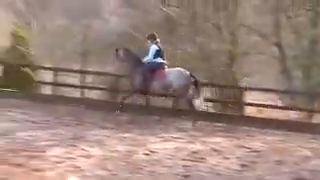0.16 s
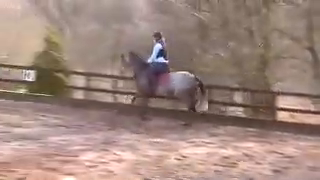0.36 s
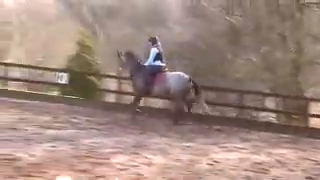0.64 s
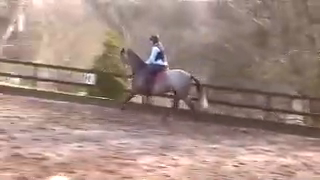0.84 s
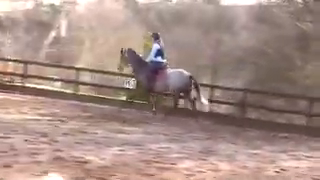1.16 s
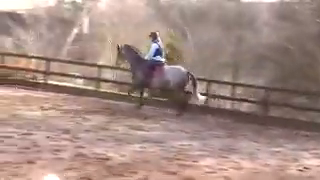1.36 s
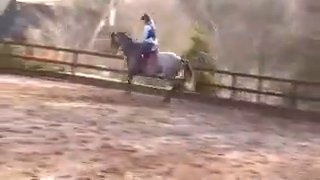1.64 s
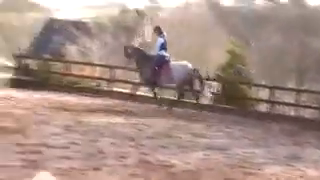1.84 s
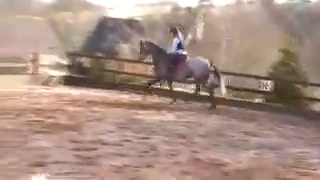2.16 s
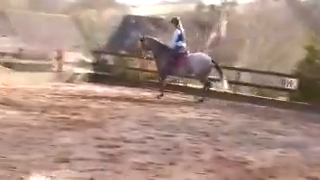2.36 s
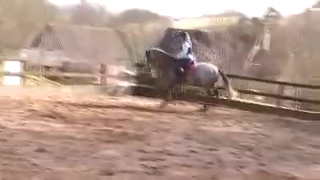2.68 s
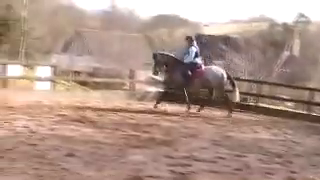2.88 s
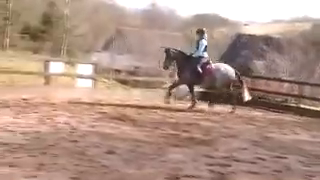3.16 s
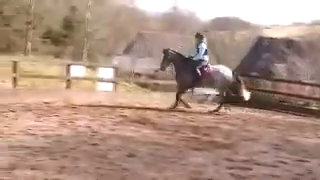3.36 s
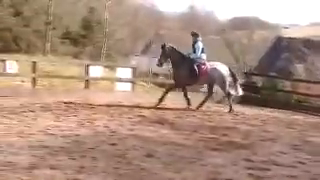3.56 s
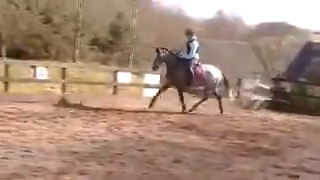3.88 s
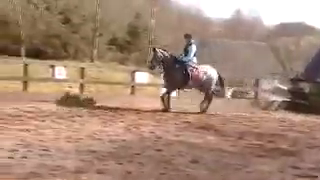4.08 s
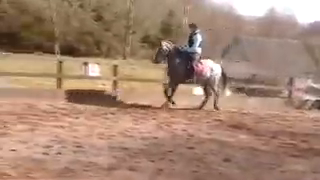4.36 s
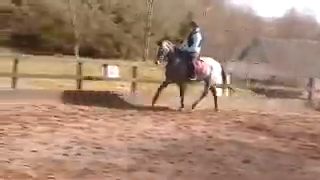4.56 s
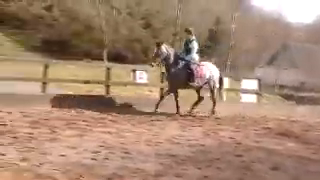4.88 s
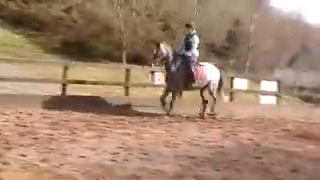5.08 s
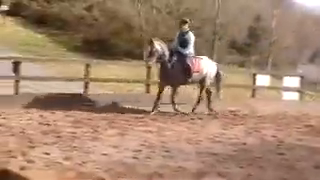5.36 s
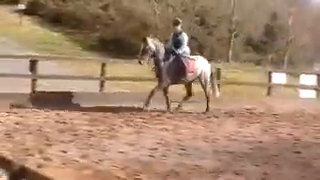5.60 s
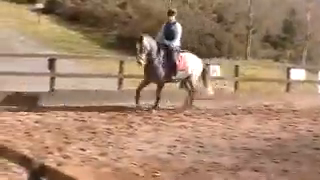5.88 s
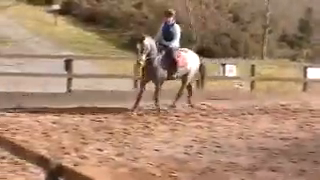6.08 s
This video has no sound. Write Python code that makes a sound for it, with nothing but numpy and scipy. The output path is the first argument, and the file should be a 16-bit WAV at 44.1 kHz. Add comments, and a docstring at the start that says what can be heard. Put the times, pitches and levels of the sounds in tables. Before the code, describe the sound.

A low, soft wash of open air and a fluttering fine hiss run throughout, in mono with faint diffuse reflections. In the first 0.3 s come a bright sand flick, a barely audible high tone, a scuff, a soft saddle bump and a dull low hoof thud. Light scuffs and sand patters follow, with a hard click at 0.5 s and a thin ringing one near 1.3 s. A thud at 1.6 s and a sharp click at 1.8 s precede a heavy, hollow blow at 1.9 s, then falling sand and a lower thump. Small clicks and scuffs scatter around 2.1-2.7 s; it grows sparser, with faint bumps, until a loud hard clack at 3.8 s. A gritty scrape comes at 4.1 s, low thuds at 4.6 s and faint, very high tones around 5 s. The heaviest knocking thump lands at 5.4 s, followed by softer thuds at 5.6, 5.8 and 6.1 s.

```python
"""A horse trots round an outdoor sand arena, under a low wash of air and a restless noise-band hiss.
Bright flicks of sand, a faint high tone, a scuff and a soft saddle bump come first, each with a diffuse answer.
Then weighted hooves fall among the scuffs: noise grains make thud, crack and spray, a sine makes the push.
Hard clicks of tack and stones join after half a second, as grains over decaying tones.
Heavy blows near two seconds and, heaviest, late on bring out a short, hollow-coloured cluster of tones."""
import sys
import numpy as np
from scipy import signal
from scipy.fft import rfft, irfft, next_fast_len
from scipy.io import wavfile
from scipy.ndimage import map_coordinates

SR = 44100
rng = np.random.default_rng(int(sys.argv[2]) if len(sys.argv) > 2 else 0)


def file_out(sig):
    """Save sig as 16-bit WAV at sys.argv[1]."""
    # one column per channel
    cols = np.atleast_2d(sig).T
    # limit, then scale
    lim = np.clip(cols, -1, 1)
    pcm = np.round(lim * 32767).astype(np.int16)
    wavfile.write(sys.argv[1], SR, pcm)


N = 275007
TOP_HZ = 14000  # upper band limit
BLOW = np.arange(int(SR * .7)) / SR  # time axis of one event in seconds

# All event levels are relative: each part of a sound adds its own offset in dB.
# Spectrum of the open air. Each row: frequency in Hz, density in dB per Hz.
AIR_SPECTRUM = [(15, -61), (25, -19), (113, -3), (164, -1.5), (403, -5), (525, -6), (824, -5.5), (1190, -8),
                (1680, -9.5), (2570, -11.5), (4370, -15.5), (10700, -15.5), (12600, -18), (14000, -26)]
# Hiss of leaves and settling sand. Each row: time in seconds, relative level in dB.
HISS_LEVELS = [(0.0, -56.5), (1.02, -61), (1.44, -54), (1.63, -55.5), (1.98, -57), (2.19, -58), (3.56, -61),
               (3.89, -58.5), (4.79, -60), (5.4, -57.5), (5.51, -57), (6.24, -57.5)]

# Flicks of loose sand. Each row: start in seconds, rise in seconds, relative level in dB.
SAND_FLICKS = [(0.029, 0.0016, -48), (0.16, 0.0044, -48), (0.448, 0.0014, -46.5), (0.52, .016, -51.5),
               (0.69, 0.032, -53.5), (0.802, .002, -50), (0.91, 0.013, -46.5), (1.016, 0.0065, -51),
               (1.155, 0.0076, -44.5), (1.191, .002, -50), (1.685, 0.0033, -45.5), (1.862, .003, -51),
               (2.538, 0.0033, -44), (5.086, 0.027, -43), (5.687, 0.0027, -49)]
FLICK_T60_S, FLICK_T60_PER_RISE = 0.057, 5.4  # a slower throw scatters for longer
# Treble of flicks and clicks. Each row: frequency in Hz, density in dB per Hz.
SNAP_SPECTRUM = [(1500, -36), (2800, -6), (3550, -5.5), (4500, -9.5), (6000, -5.5), (7000, -3), (9300, 0.5),
                 (11500, -1), (14000, -17)]

# Reverberation of fence and trees. Each row: frequency in Hz, time to fall 60 dB in seconds.
ARENA_DECAY = [(100, 0.89), (500, 0.71), (2000, 0.42), (6000, 0.39), (13000, 0.2)]

# Faint thin high tones, perhaps of tack or a distant bird.
# Each row: start in seconds, pitch in Hz, relative level in dB.
FAINT_TONES = [(.08, 3560, -58.5), (1.4, 3940, -58), (3.96, 4120, -58), (4.969, 9300, -47),
               (5.336, 9160, -48.5)]
# Cycles to build up, then cycles to fall 60 dB: higher tones are shorter.
TONE_RISE_CYCLES, TONE_FALL_CYCLES = 200, 2000

# Hooves skimming the surface, and at 1.985 s sand falling back after the heavy blow.
# Each row: start in seconds, rise in seconds, relative level in dB, grit (crunch over knock) in dB.
SCUFFS_AND_FALLING_SAND = [(0.095, 0.0091, -46, -3), (0.356, 0.0066, -44, -4.5), (0.498, 0.028, -39, -13),
                           (0.57, .005, -43.5, -8), (0.69, 0.042, -51, -7), (1.227, 0.0058, -41, -8),
                           (1.351, 0.011, -43.5, -6.5), (1.985, 0.024, -43, 4.5), (2.223, 0.006, -40, -7),
                           (2.381, .011, -43, -4.5), (2.619, 0.021, -47.5, -3), (3.301, .004, -55.5, 2),
                           (4.124, 0.017, -33.5, 2.5), (4.326, .004, -42, -12), (4.388, 0.0034, -40, -8.5),
                           (4.836, 0.021, -47.5, -12), (4.982, 0.016, -38, 0.5), (5.084, .026, -45, -2.5)]
# These hardly sink in, so they have little thud; their pitch varies about the middle value.
SCUFF_T60_S, SCUFF_DEPTH_DB, SCUFF_MIDDLE_HZ = 0.28, -10.5, 334
# Hooves landing under full weight. Each row: start in seconds, rise in seconds,
# base time to fall 60 dB in seconds, relative level in dB, grit (crunch over knock) in dB,
# pitch of the push in Hz.
WEIGHTED_FOOTFALLS = [(0.208, 0.007, 0.35, -30, -12, 171), (0.279, 0.015, 0.23, -41, -2.5, 179),
                      (1.583, .004, 0.22, -36.5, -1, 128), (1.9, 0.0015, 0.28, -18, -6.5, 386),
                      (2.052, 0.0083, .25, -29, -2, 181.4), (3.162, 0.0064, 0.38, -41.5, -4.5, 119),
                      (4.59, .018, 0.44, -34, -15.5, 159.6), (4.668, 0.0096, 0.32, -41.5, -3, 161),
                      (5.419, 0.0089, 0.21, -15.5, -4.5, 251.4), (5.574, 0.026, 0.23, -31, -8.5, 234),
                      (5.61, 0.019, .2, -29.5, -7, 302.6), (5.811, .02, 0.36, -38.5, -3, 394),
                      (6.092, 0.018, 0.29, -31, -11.5, 139), (6.13, 0.006, .36, -37, -5.5, 124)]
# At the firm pitch thud and knock are alike; softer ground is lower and thuds more.
FIRM_HZ, SINK_DB_PER_OCTAVE = 294, 5.5
# Gritty, shallow steps throw the most sand (dB, dB per dB, dB per dB).
SPRAY_DB, SPRAY_PER_GRIT, SPRAY_PER_DEPTH = -8, 0.99, -0.24
# Spectra of the four grain parts of a blow. Each row: frequency in Hz, density in dB per Hz.
THUD_SPECTRUM = [(25, -40), (50, -24), (80, -10.5), (120, -3), (165, -3.5), (270, -5.5), (380, -20),
                 (900, -59)]
KNOCK_SPECTRUM = [(120, -49), (240, -10), (330, 1), (550, 0), (820, -0.5), (1050, -4.5), (1600, -15),
                  (4000, -65)]
CRUNCH_SPECTRUM = [(400, -49), (850, -20), (1100, -3), (1700, 0.5), (2400, -3), (3100, -11.5),
                   (4500, -19.5), (9000, -94)]
SPRAY_SPECTRUM = [(1200, -87), (2500, -2), (3400, 3), (5200, 3), (7500, 1), (9500, 3.5), (12500, 3),
                  (14000, -14)]
# Tones that colour a heavy blow. Each row: frequency in Hz, mean relative level in dB,
# time to fall 60 dB in seconds.
HOLLOW_TONES = [(168, -2, 0.49), (241.8, -5.5, 0.65), (322.8, -1, 0.25), (400, -22, 0.15), (520, -28, 0.25),
                (520, -3, 0.08), (636, 1, 0.31), (751, -4, 0.35), (813, 0, 0.28), (856, -17, 0.14),
                (1050, -26, 0.21), (1220, -11.5, 0.31), (1326, -5.5, 0.23), (1522, 2, 0.1),
                (1564, -6.5, 0.18), (1790, -8, 0.074)]

# Soft bumps of the saddle. Each row: start in seconds, relative level in dB.
SADDLE_BUMPS = [(0.112, -24.5), (.724, -31.5), (0.885, -33.5), (2.511, -34), (3.123, -35), (3.621, -37),
                (3.9, -31), (4.517, -31.5)]
BUMP_HZ = 195

# Sharp clicks of tack and stones. Each row: start in seconds, base time to fall 60 dB in seconds,
# relative level in dB, hardness (crack over body) in dB.
SHARP_CLICKS = [(0.505, 0.04, -44, 13), (1.277, 0.16, -33, 36), (1.685, 0.079, -45, 24),
                (1.798, 0.07, -28, 15), (2.125, 0.016, -44, -12), (2.263, 0.032, -53, 3),
                (2.297, .03, -50, 6), (2.318, 0.031, -53, 7), (2.664, 0.054, -45.5, 8),
                (3.555, 0.12, -41.5, 11.5), (3.727, 0.32, -42, 5.5), (3.775, 0.068, -19.5, 4)]
CONTACT_S = 0.00399  # build-up of a click
SNAP_DB, SNAP_PER_HARDNESS = 1.5, -0.48  # hard contacts ring more than they snap
# Body of a click. Each row: frequency in Hz, density in dB per Hz.
CLACK_SPECTRUM = [(130, -42), (300, -4), (420, -7.5), (620, 1), (920, 2.5), (1150, -13), (2000, -46),
                  (5000, -68)]
# Modes of the hard tack. Each row: frequency in Hz, mean relative level before tilt in dB,
# time to fall 60 dB in seconds.
TACK_RING_MODES = [(855, -8, 0.1), (926, 3, 0.098), (987, 0.5, 0.075), (1502, -21, 0.15), (1745, -5, 0.017),
                   (1810, 4.5, 0.072), (1920, 7.5, 0.03), (2343, -1.5, 0.068), (2540, -2, 0.028),
                   (2743, 5, 0.039), (3432, 0.5, 0.039), (3620, -5, 0.04)]


def amp(db):
    """Decibel law: 20 dB is a factor of ten in amplitude."""
    return 10 ** (np.asarray(db) / 20)


def unit(x):
    """Normalisation of mean power: scale to rms 1."""
    return x / np.sqrt(np.mean(x ** 2) + 1e-20)


def along(points, hz):
    """Logarithmic frequency scale: interpolate (Hz, value) points on it."""
    f, v = np.transpose(points)
    return np.interp(np.log(hz + 1), np.log(f + 1), v)


def fade(t, t60):
    """Exponential decay: 60 dB down at t60."""
    return 10 ** (-3 * t / t60)


def coloured(x, spectrum):
    """Minimum-phase filtering: folding the cepstrum makes a (Hz, dB) response causal."""
    m = next_fast_len(len(x) + 4096)
    gain = amp(along(spectrum, np.fft.rfftfreq(m, 1 / SR)))
    cepstrum = irfft(np.log(gain), m)
    cepstrum[1:m // 2] *= 2
    cepstrum[m // 2 + 1:] = 0
    response = np.exp(rfft(cepstrum))
    return irfft(rfft(x, m) * response, m)[:len(x)]


def add(track, s, sound):
    """Superposition: mix a sound into the track at time s."""
    start = max(round(s * SR), 0)
    track[start:start + len(sound)] += sound[:max(N - start, 0)]


def swell(rise, t60):
    """Envelope of an event: a linear build-up, then exponential decay."""
    build_up = np.clip(BLOW / max(rise, 1e-4), 0, 1)
    return build_up * fade(np.maximum(BLOW - rise, 0), t60)


def grains(force, spectrum, rate, spread_db):
    """Granular noise: random collisions (rate per second) of uneven size carry the energy of a force."""
    hit = rng.random(len(force)) < rate / SR
    sign = rng.choice([-1, 1], len(force))
    size = sign * amp(spread_db * np.clip(rng.standard_normal(len(force)), -2, 2))
    force_rms = np.sqrt(np.mean(force ** 2))
    return unit(coloured(hit * size * force, spectrum)) * force_rms


def push(hz, t60, attack):
    """Damped oscillation: a few low cycles as the ground or leather gives way."""
    return np.sin(2 * np.pi * hz * BLOW) * fade(BLOW, t60) * (1 - np.exp(-BLOW / attack))


def tone_cluster(tones, attack, tilt_db=0):
    """Sum of damped sinusoids: new strengths each time; tilt is per octave, the total size stays 1."""
    hz, db, t60 = np.transpose(tones)[:, :, None]
    size = amp(db + tilt_db * np.log2(hz) + rng.standard_normal(hz.shape))
    # each phase wanders, the high ones most, which blurs the pitch
    steps = rng.standard_normal((len(hz), len(BLOW)))
    wander = np.cumsum(steps, axis=1) * .0055 * (hz / 1000) ** .8  # in cycles
    waves = size * np.sin(2 * np.pi * (hz * BLOW + wander)) * fade(BLOW, t60)
    return waves.sum(0) / np.linalg.norm(size) * (1 - np.exp(-BLOW / attack))


def open_air():
    """Filtered noise: a low wash of air below 3 kHz, a fine hiss of leaves and settling sand above."""
    t = np.arange(N) / SR
    hiss_db = np.interp(t, *np.transpose(HISS_LEVELS))
    flutter_db = map_coordinates(rng.standard_normal(200), [t * 24])  # 24 random points per second
    wash = coloured(rng.standard_normal(N), AIR_SPECTRUM)
    rustle = grains(np.ones(N), AIR_SPECTRUM, rate=9000, spread_db=4)
    low = unit(signal.sosfilt(signal.butter(2, 3000, "low", fs=SR, output="sos"), wash))
    high = unit(signal.sosfilt(signal.butter(2, 3000, "high", fs=SR, output="sos"), rustle))
    # the wash swells a little with the hiss
    wash_db = -53.5 + 0.5 * (hiss_db - np.median(hiss_db))
    return (low * amp(wash_db) + high * amp(hiss_db + 1.0)) * amp(flutter_db)


def flicks():
    """Granular impact: thrown sand lands in short, bright patters."""
    track = np.zeros(N)
    for s, rise, db in SAND_FLICKS:
        force = swell(rise, FLICK_T60_S + FLICK_T60_PER_RISE * rise)
        add(track, s, amp(db + 1.0) * grains(force, SNAP_SPECTRUM, rate=2300, spread_db=-0.5))
    return track


def arena(x):
    """Diffuse reflection: convolution with decaying noise answers for fence and trees; treble dies first."""
    hz, t, z = signal.stft(rng.standard_normal(len(BLOW)), SR, nperseg=256)
    decay = fade(t, along(ARENA_DECAY, hz)[:, None])
    tail = signal.istft(z * decay, SR, nperseg=256)[1][:len(BLOW)]
    tail = tail * np.clip(BLOW / 0.0033, 0, 1)
    return signal.fftconvolve(x, tail / np.linalg.norm(tail))[:N]


def faint_tones():
    """Phase-noisy sinusoids: faint thin high tones, perhaps of tack or a distant bird, swell and fade."""
    track = np.zeros(N)
    for s, hz, db in FAINT_TONES:
        # the phase wanders, which blurs the pitch
        drift = np.cumsum(rng.standard_normal(len(BLOW))) * hz / 55000
        tone = np.sin(2 * np.pi * hz * BLOW + drift)
        add(track, s, amp(db) * swell(TONE_RISE_CYCLES / hz, TONE_FALL_CYCLES / hz) * tone)
    return track


def hoof(rise, t60, level_db, depth_db, grit_db, hz):
    """Inelastic impact: ground packs, clods crack, sand sprays; hollow tones grow faster than the thud."""
    heaviest_db = max(row[3] for row in WEIGHTED_FOOTFALLS)
    thud_db, crunch_db = level_db + depth_db, level_db + grit_db
    spray_db = level_db + SPRAY_DB + SPRAY_PER_GRIT * grit_db + SPRAY_PER_DEPTH * depth_db
    # a shallow step keeps more of its push than of its thud
    push_db = max(thud_db, (thud_db + level_db) / 2) + 6.5
    hollow_db = thud_db + 2.5 + 0.8 * (thud_db - heaviest_db)
    force = swell(rise, t60)

    ground = amp(thud_db - 4.0) * grains(force, THUD_SPECTRUM, rate=3000, spread_db=2.0)
    ground += amp(push_db) * push(hz, t60=0.14, attack=max(rise, 1e-4))
    ground += amp(hollow_db) * tone_cluster(HOLLOW_TONES, attack=0.0035)

    clods = amp(level_db - 1.0) * grains(force, KNOCK_SPECTRUM, rate=2200, spread_db=2.0)
    crunch_force = swell(rise, t60 * 0.73)
    clods += amp(crunch_db + 1.0) * grains(crunch_force, CRUNCH_SPECTRUM, rate=2000, spread_db=0.5)
    # loose crumbs fall back sparsely
    crumbs = grains(swell(.02, .42), CRUNCH_SPECTRUM, rate=70, spread_db=4)
    clods += amp(min(crunch_db - 11, -43)) * crumbs

    spray_force = swell(rise * 0.9, t60 * 0.88)
    sand = amp(spray_db) * grains(spray_force, SPRAY_SPECTRUM, rate=4000, spread_db=1.0)
    return ground + clods + sand


def hooves():
    """Yielding ground: weighted hooves thud more the lower their pitch; scuffs and falling sand thud little."""
    track = np.zeros(N)
    for s, rise, level_db, grit_db in SCUFFS_AND_FALLING_SAND:
        hz = SCUFF_MIDDLE_HZ * rng.uniform(0.777, 1.4)
        add(track, s, hoof(rise, SCUFF_T60_S, level_db, SCUFF_DEPTH_DB, grit_db, hz))
    for s, rise, t60, level_db, grit_db, hz in WEIGHTED_FOOTFALLS:
        depth_db = SINK_DB_PER_OCTAVE * np.log2(FIRM_HZ / hz)
        add(track, s, hoof(rise, t60, level_db, depth_db, grit_db, hz))
    return track


def bumps():
    """Heavily damped oscillation: the saddle bumps softly as its leather gives way."""
    track = np.zeros(N)
    for s, db in SADDLE_BUMPS:
        add(track, s, amp(db + 10.5) * push(BUMP_HZ, t60=0.025, attack=0.0097))
    return track


def clicks():
    """Contact stiffness: the less body a hard little contact has, the more it rings the high modes."""
    track = np.zeros(N)
    for s, t60, db, hardness_db in SHARP_CLICKS:
        body_force = swell(CONTACT_S, t60 * 2.2)
        crack_force = swell(CONTACT_S, t60 * 0.75)
        snap_force = swell(CONTACT_S, t60 * .5)
        snap_db = db + SNAP_DB + SNAP_PER_HARDNESS * max(hardness_db, 0)
        body = amp(db - hardness_db - 5.5) * grains(body_force, CLACK_SPECTRUM, rate=2100, spread_db=-0.5)
        crack = amp(db - 2.5) * grains(crack_force, CRUNCH_SPECTRUM, rate=3900, spread_db=1)
        snap = amp(snap_db) * grains(snap_force, SNAP_SPECTRUM, rate=3900, spread_db=1)
        add(track, s, body + crack + snap)
        tilt_db = np.clip(hardness_db - 2, 0, 12)
        modes = tone_cluster(TACK_RING_MODES, attack=0.00066, tilt_db=tilt_db)
        add(track, s + CONTACT_S / 2, amp(db + 6.0) * modes)
    return track


def scene():
    """Superposition: the near sounds, their diffuse answer and the air add up in one channel."""
    near = flicks() + faint_tones() + hooves() + bumps() + clicks()
    return (open_air() + near + amp(-17.0) * arena(near))[None]


def record(dry):
    """Band limitation: nothing passes at or above the top frequency."""
    m = next_fast_len(N + SR // 2)
    passband = np.fft.rfftfreq(m, 1 / SR) < TOP_HZ
    return irfft(rfft(dry, m) * passband, m)[..., :N]


dry = scene()
out = record(dry)
file_out(out)
```